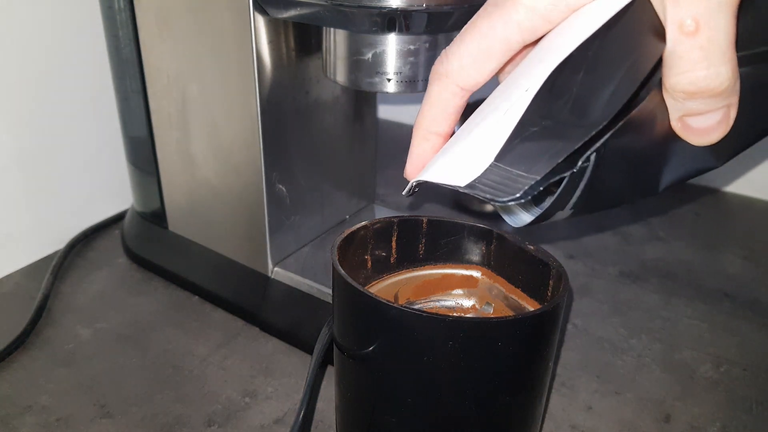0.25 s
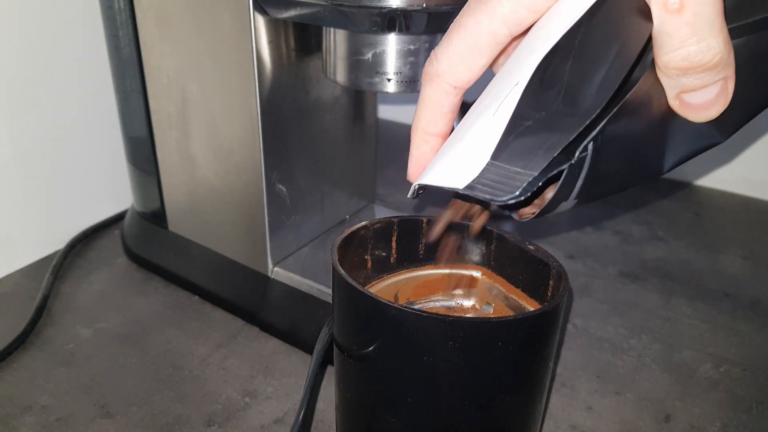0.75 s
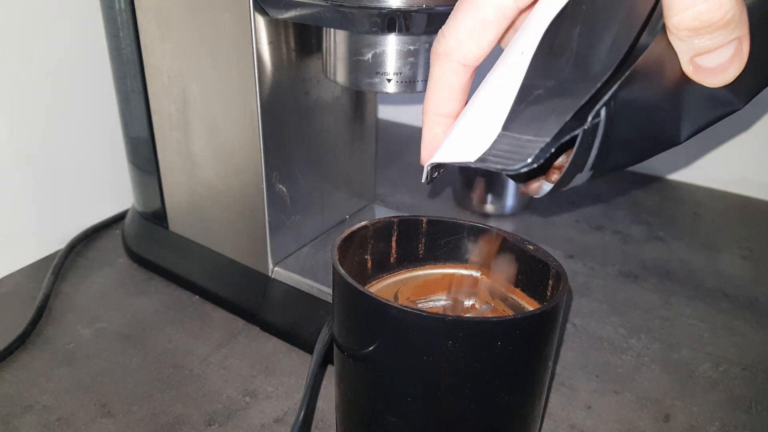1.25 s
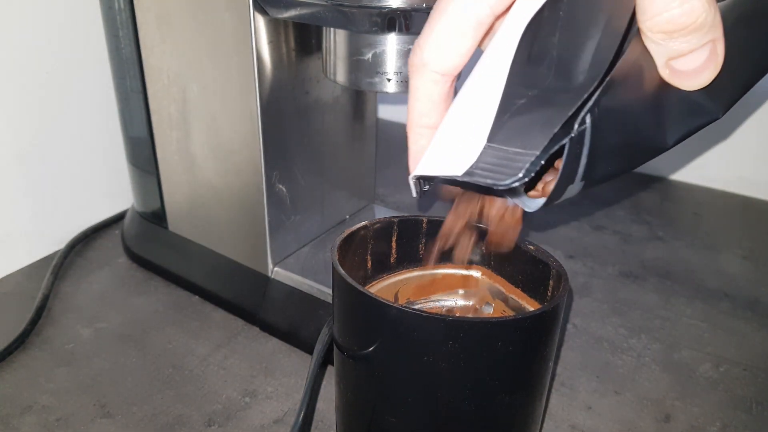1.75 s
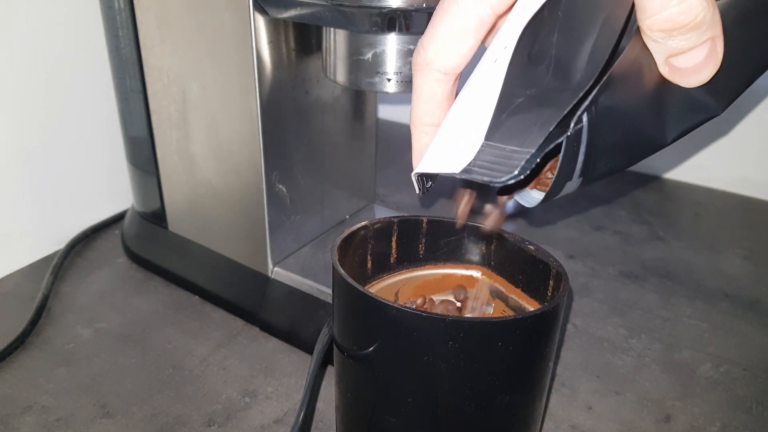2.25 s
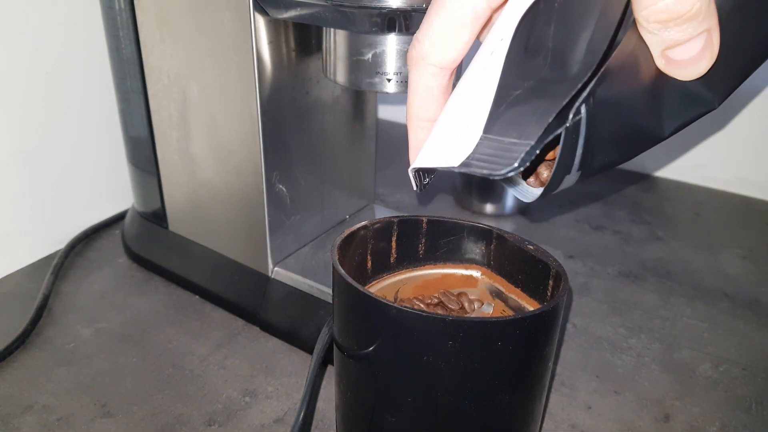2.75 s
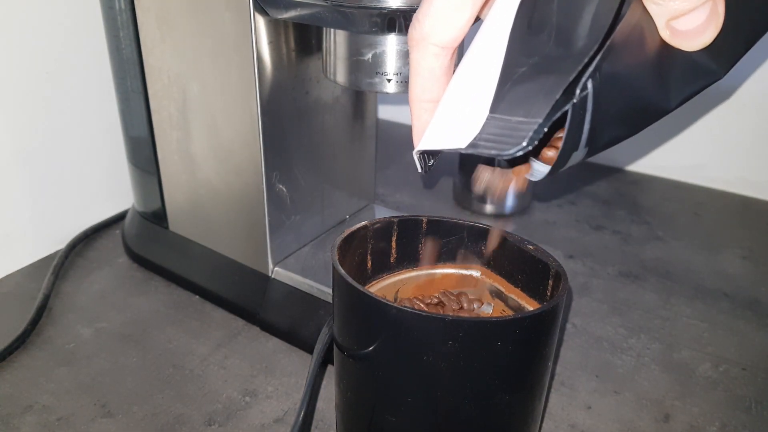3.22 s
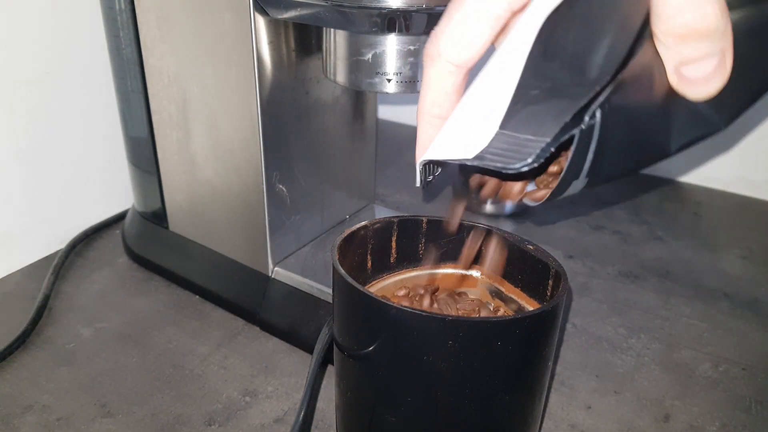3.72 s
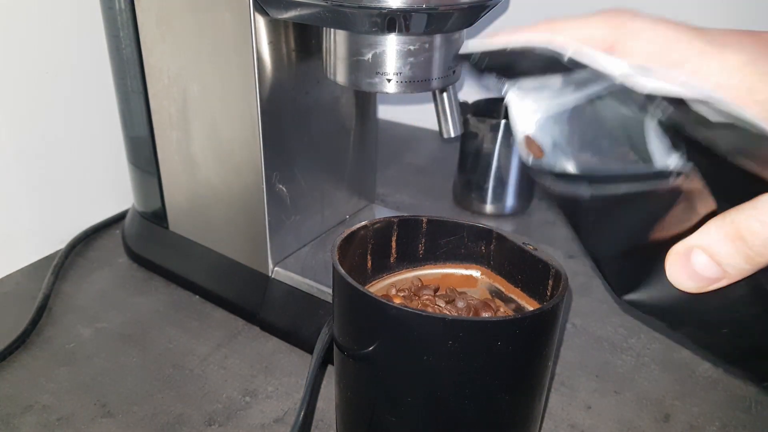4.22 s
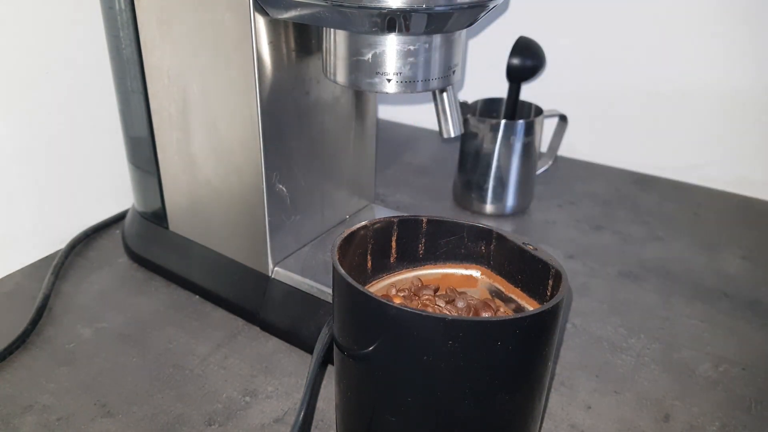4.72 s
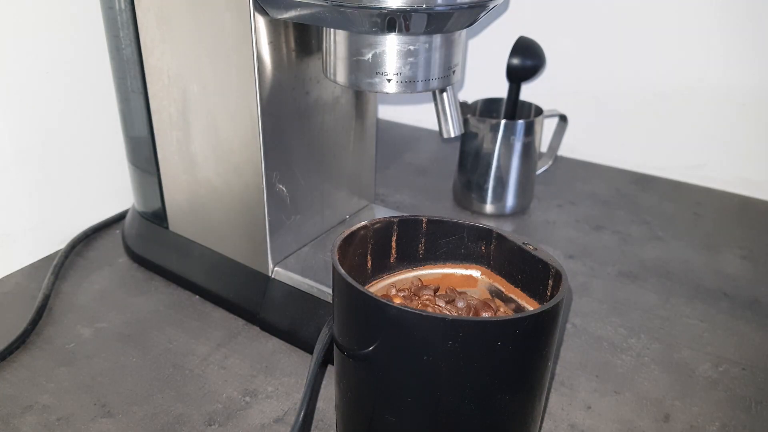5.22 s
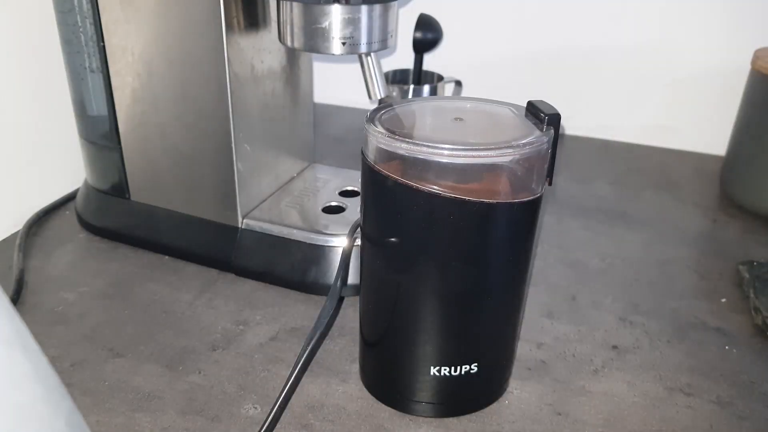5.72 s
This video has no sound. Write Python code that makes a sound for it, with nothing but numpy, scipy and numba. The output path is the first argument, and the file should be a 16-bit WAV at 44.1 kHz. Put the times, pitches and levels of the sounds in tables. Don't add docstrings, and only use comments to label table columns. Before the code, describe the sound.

Coffee beans tick and ring into a small metal cup from a crinkling bag, followed by loud foil crumpling, a slump and quiet.

```python
import sys
import numpy as np
from scipy import signal
from scipy.fft import rfft, irfft
from scipy.io import wavfile
from scipy.ndimage import uniform_filter1d
from numba import njit

SR = 44100
rng = np.random.default_rng(int(sys.argv[2]) if len(sys.argv) > 2 else 0)


def store_pcm(level_fs):
    pcm = np.round(np.clip(level_fs, -1, 1) * 32767).astype(np.int16)
    wavfile.write(sys.argv[1], SR, np.atleast_2d(pcm).T)


def amplitude_ratio(level_db):
    exponent = np.asarray(level_db, float) / 20
    return 10 ** exponent


N = 263277
SCENE_CHANGE_S = 5.386

# time in seconds, drag on the foil in dB.
TILT = [(0, -46.5), (.06, -50.5), (.1, -47.5), (.265, -52), (.42, -43.5), (.55, -38.5), (.68, -39.5),
        (1.145, -49), (1.265, -52), (1.41, -48), (1.875, -44), (2.23, -48), (2.4, -44), (2.69, -51.5),
        (2.775, -47.5), (2.865, -57), (2.93, -52), (3.3, -48), (3.38, -41.5), (3.74, -43), (3.945, -49)]
# time in seconds, drag in dB, weight on the counter in dB.
PUT_DOWN = [(3.945, -54, -27.5), (4.005, -39.5, -20), (4.035, -45.5, -31), (4.07, -31, -25),
            (4.11, -42.5, -25), (4.26, -35.5, -21), (4.335, -37, -24), (4.37, -31, -19.5),
            (4.445, -39.5, -21.5), (4.505, -40.5, -7), (4.62, -38.5, -10.5), (4.7, -42.5, -25.5),
            (4.77, -34.5, -25.5), (4.85, -40, -22.5), (5.01, -64.5, -48)]
# time in seconds, drag in dB, weight on the counter in dB.
SLUMP = [
    (5.01, -56.5, -36),
    (5.1, -58.5, -14),
    (5.128, -46.5, -1.5),
    (5.16, -54, 0),
    (5.228, -49.5, -25),
    (5.246, -34.5, -11.5),
    (5.33, -44.5, -16.5),
    (5.38, -53.5, -19),
]
# start in seconds, peak in dB, pitch in Hz, edge above 2.5 kHz in dB.
SNAPS = [(.077, -25.5, 1490, -16), (0.083, -29, 1490, -11), (0.107, -38, 900, -2), (.125, -38.5, 700, -25),
         (.345, -32, 720, -20), (.417, -29, 1510, -12), (0.225, -28, 2720, 0.5), (0.312, -36.5, 1570, -1),
         (0.409, -26, 755, -13), (.021, -27.5, 1480, -27), (.178, -30.5, 1300, -21), (.276, -38, 2740, 1),
         (.36, -44, 1400, -12), (0.476, -27, 1500, -12.5), (.489, -25, 1800, -11.5), (0.503, -34, 1400, -3),
         (.577, -29.5, 1490, -9), (0.659, -23, 1700, -1), (.694, -30, 1510, 2), (4.051, -29, 1210, -16.5),
         (4.124, -27, 1060, -22), (4.151, -20.5, 1390, -9.5), (4.281, -23.5, 2020, -6.5),
         (4.323, -26.5, 1200, -21), (4.385, -20.5, 1100, -22.5), (4.7, -22, 920, -19),
         (4.728, -17, 1140, -16), (4.804, -23, 1490, -22), (4.93, -43, 1240, -20), (4.958, -38, 1800, -17),
         (5.04, -37, 2100, -15), (3.414, -20.5, 1170, -17), (3.992, -27.5, 1190, -28),
         (4.064, -29.5, 1440, -15), (4.255, -22, 2220, -19.5), (4.362, -15, 1100, -25),
         (4.425, -15, 1010, -32.5), (4.453, -12.5, 980, -31), (4.472, -12, 910, -24.5),
         (4.482, -19, 710, -23.5), (4.484, -10.5, 890, -28.5), (4.496, -13.5, 1080, -26.5),
         (4.501, -3.5, 1590, -35), (4.508, -13, 1030, -26.5), (4.554, -11, 1120, -22.5),
         (4.6484, -1, 1080, -32), (4.744, -4.5, 1970, -13), (4.865, -15, 1265, -16.5),
         (5.108, -23, 700, -10), (5.124, -14, 2040, 0.5), (5.152, -27, 1930, -22), (5.235, -23, 606, -17),
         (5.245, -24, 2100, 2.5), (5.293, -21.5, 1073, -24.5), (5.313, -14.5, 1373, -50)]
# start in seconds, peak in dB.
CRACKS = [
    (.226, -44),
    (.312, -37),
    (.408, -32),
    (4.474, -46),
    (4.504, -45),
    (4.6487, -30.5),
    (4.7445, -45),
    (5.1245, -34),
    (5.245, -43),
]
# start in seconds, peak in dB, pitch in Hz.
BUMPS = [(.87, -61, 83), (1.03, -48, 80), (1.451, -34.5, 427), (3.294, -47, 68.1), (3.328, -39, 140),
         (3.57, -48, 55), (4.483, -28, 210), (4.645, -33, 81), (4.648, -29, 252), (4.717, -30.5, 272),
         (5.112, -42, 60), (5.125, -41, 150), (3.698, -43, 162), (4.2, -46, 170), (4.35, -48, 170),
         (5.271, -50, 71)]
# start in seconds, level in dB, pitch in Hz, 60 dB decay in seconds.
CHIMES = [
    (6.8, -39.5, 1900, 0.12),
    (4.746, -30.5, 1990, 0.15),
    (2.92, -40, 636, 0.038),
    (2.76, -41, 880, 0.026),
    (4.505, -29, 300, 0.039),
]
# frequency in Hz, level in dB per Hz.
RUSTLE = [(150, -47), (250, -13), (434, -13), (554, -5), (646, -4), (1210, 0.5), (3500, -11.5),
          (4550, -40.5), (7700, -120)]
FOIL = [(1060, -41.5), (1800, 0.5), (3480, -5), (4790, -7), (6020, -13.5), (8130, -28.5), (12200, -17.5),
        (16000, -28)]
RUMBLE = [(15, -50.5), (36, -22.5), (62, -1.5), (144, -7.5), (193, 8.5), (450, 3.5), (580, -42),
          (990, -120)]
# frequency in Hz, width in Hz, gain in dB.
POUCH = [(560, 70, 7), (727, 26, 9.5), (1167, 36, 6), (1560, 32, 5), (2010, 200, 6.5)]
# frequency in Hz, gain in dB.
CRUMPLED = [(300, -2), (600, -2.5), (900, 2), (1400, 1.5), (2300, -3), (4000, -4.5)]
EDGE = [(700, -25), (1800, -1.5), (3500, 3), (5500, 2), (7500, -15), (11000, -15), (16000, -25.5)]

# time in seconds, flow in dB.
FLOW = [(.7, -53), (.8, -57), (.925, -32), (1.04, -44.5), (1.2, -40), (1.335, -43.5), (1.5, -66),
        (1.625, -45), (1.87, -43.5), (2.11, -41.5), (2.23, -48.5), (2.6, -45.5), (2.86, -56), (2.92, -61),
        (3.135, -58.5), (3.475, -41.5), (3.885, -48), (3.955, -82)]
# start in seconds, peak in dB, strongest ring in Hz, tick in dB.
STRIKES = [(0.73, -28, 2960, -32), (0.7744, -19, 3190, -32), (0.7877, -23.5, 5230, -27.5),
           (0.8289, -23, 4800, -45), (0.843, -16.5, 5150, -20), (0.921, -27.5, 2870, -42),
           (1.09, -29, 4160, -45), (1.176, -32, 4290, -28), (1.188, -27, 3270, -22),
           (1.3172, -25.5, 5430, -21), (1.344, -26, 3040, -25), (1.531, -28, 2920, -38),
           (1.614, -22.5, 3060, -31), (1.6871, -25, 4800, -25.5), (1.742, -24.5, 3270, -30),
           (1.811, -29.5, 3040, -29), (1.853, -26, 3100, -26), (1.9045, -25.5, 3900, -48),
           (1.942, -29, 4220, -32), (2.0213, -28, 3250, -33), (2.094, -29.5, 4230, -30),
           (2.1014, -27, 3140, -30), (2.18, -24, 4360, -27), (2.3375, -30.5, 2760, -32.5),
           (2.3604, -25.5, 5570, -36), (2.5718, -26.5, 3820, -34), (2.8933, -33, 3180, -35.5),
           (3.155, -34.5, 5860, -33), (3.2643, -27.5, 3480, -34.5), (3.3535, -26.5, 4510, -51),
           (.853, -41.5, 3050, -52.5), (0.8975, -34, 2800, -49), (0.9033, -25.5, 3200, -45),
           (.818, -32, 4360, -51), (1.725, -29, 4000, -32), (1.662, -35, 4200, -42),
           (0.955, -34, 4370, -31), (1.027, -25, 4300, -38), (1.125, -42, 4530, -41),
           (1.2563, -47, 4600, -36), (1.292, -40, 3100, -51), (1.4716, -43, 2966, -62),
           (1.5709, -49, 2580, -58), (1.627, -34, 4250, -42), (1.636, -32, 4030, -45),
           (1.67, -27.5, 3200, -32), (1.837, -32, 4260, -30), (1.845, -35, 4360, -29.5),
           (2.2327, -42, 2700, -45), (2.2423, -39, 2900, -43), (2.2605, -31, 2810, -48),
           (0.936, -31.5, 4300, -44.5), (2.131, -35, 4150, -32), (2.621, -51, 3200, -49)]
# start in seconds, peak in dB, pitch in Hz, ring passed to the steel in dB.
TICKS = [(.8168, -25, 10550, -42.5), (.8649, -33, 12180, -59.5), (.9036, -26.5, 11780, -33.5),
         (.9636, -26.5, 10550, -30), (1.1437, -27, 12800, -34.5), (1.291, -29, 12900, -35),
         (1.3916, -31.5, 13500, -35.5), (1.555, -27.5, 14070, -66.5), (1.866, -23, 9590, -29.5),
         (1.8937, -29, 12500, -59), (1.9123, -28, 13150, -53), (1.9834, -32, 13500, -27),
         (2.2708, -27, 13750, -36), (2.3785, -32, 13700, -39), (2.4015, -26, 11940, -28),
         (2.4895, -30.5, 13800, -37), (2.5207, -31, 13580, -31), (2.5982, -24.5, 15100, -30),
         (2.6127, -38, 13900, -45), (2.6514, -28, 14620, -34), (2.7718, -28, 14860, -46),
         (3.0154, -34.5, 14300, -39.5), (3.1003, -34, 12600, -42), (3.171, -29, 13640, -38),
         (3.2063, -29, 14400, -33), (3.315, -28, 14730, -32.5), (3.417, -26, 14760, -57),
         (3.4797, -27, 14100, -52), (3.5835, -28.5, 13570, -30.5), (3.7184, -29, 13200, -37),
         (.8935, -30.5, 12940, -48), (1.0755, -36.5, 15300, -52), (1.115, -36, 13500, -57),
         (1.792, -41.5, 14500, -48), (2.446, -40, 13000, -47), (2.4679, -37, 13900, -37),
         (2.687, -39.5, 12400, -50), (2.8715, -52, 10900, -64), (3.2931, -40, 12200, -40),
         (3.4377, -38, 11700, -60), (3.4642, -30, 14400, -54), (3.534, -30.5, 11800, -36),
         (3.6403, -35, 12100, -44), (3.6802, -40, 13400, -54), (3.7066, -36, 12640, -50),
         (3.8154, -45, 11900, -53), (3.93, -53, 12000, -60), (3.998, -45, 13900, -54),
         (4.062, -41, 13400, -51.5), (4.088, -53, 12040, -61)]
# start in seconds, tick in dB, ring in dB.
STRAYS = [(1.0024, -49, -54), (1.024, -24.5, -39), (1.075, -46, -53), (1.216, -29, -50),
          (1.4358, -46.5, -32), (1.513, -37, -49), (1.5988, -33, -31), (1.657, -36, -33), (2.073, -30, -38),
          (2.7323, -39.5, -39), (2.771, -53, -51), (2.9228, -36, -35.5), (2.955, -48, -40),
          (2.992, -55, -45), (3.048, -42.5, -40.5), (3.0856, -38, -35), (3.341, -36, -59),
          (3.405, -36.5, -59), (3.445, -41, -60), (3.633, -31, -31.5), (3.76, -34.5, -51),
          (3.8345, -35, -43), (3.8822, -40, -60), (1.151, -30, -31), (1.203, -33, -30), (1.283, -35, -49),
          (1.969, -37, -35), (2.001, -31, -41), (2.044, -34, -32.5), (2.187, -44, -35), (2.118, -36, -36),
          (2.23, -45, -54), (0.951, -37, -52), (1.098, -43, -52)]
# start in seconds, peak in dB.
BOOMS = [(0.828, -54), (0.929, -52), (1.083, -51), (1.19, -51), (1.398, -56), (1.531, -53), (1.63, -61),
         (1.714, -58.5), (1.864, -51), (1.934, -56), (2.025, -58), (2.088, -60), (2.181, -59), (2.292, -55),
         (2.47, -61), (2.534, -54), (2.655, -55), (2.905, -62), (3.102, -64), (3.183, -64), (3.277, -50),
         (3.327, -55), (3.436, -66), (3.541, -60), (3.596, -57), (3.823, -64)]
# frequency in Hz, level in dB, 60 dB decay in seconds.
CUP = [(2737, -4, 0.14), (2960, -3, 0.1), (3270, -2, 0.081), (3920, -4.5, 0.15), (4360, -5.5, 0.083),
       (4290, -3, 0.096), (4437, -2, 0.068), (4800, -2, 0.052), (5150, -3, 0.04), (5570, -1.5, 0.049),
       (6090, 0, 0.039), (9480, 4.5, 0.025), (11400, -5.5, 0.06)]
# frequency in Hz, gain in dB.
CONTACT = [(900, -30), (2200, 2), (3500, -3), (6000, -1), (8000, 2), (12000, -3.5), (16000, -2.5)]

# frequency in Hz, level in dB per Hz.
KITCHEN = [(15, -47), (28, -20), (48, 0), (64, 0), (75, -6), (323, -12), (423, -15), (1030, -19),
           (1580, -20), (2240, -14), (3640, -25), (5170, -24), (7340, -37), (12200, -17), (15600, -15)]
# frequency in Hz, gain in dB.
OPEN = [(26, -13), (45, -2), (90, 2.5), (5500, -0.5), (6800, 1), (8000, -5), (9200, -4.5), (10000, 0)]
COVERED = [(100, -32.5), (170, -20.5), (400, -59.5), (1000, -67.5), (1900, -79), (2400, -27), (3100, -80),
           (6000, -73.5), (9400, -40), (16000, -30.5)]
TOP = [(15700, 0), (15950, -36)]

TRICKLE_DB, STREAM_DB = -79, -39
FOIL_DB, FOIL_LOADED_DB = -6.5, 4
FOIL_BRIGHTENS = 0.35
FOIL_AWAY_DB = -8.5
HAND_DB, HAND_LOADED_DB = -33.5, 13
CREASE_DB, UNFOLD_DB, UNFOLD_S = -8, -26, 0.0087
BARE_RING_DB, BURIED_DB_PER_S = 9, 0.08
BURIED_RING_HZ = 2944
NOTE_DB, NOTE_CYCLES = -12, 110
TICK_HZ, TICK_RISE_HZ_PER_S, TICK_LEAD_S = 11400, 510, 0.0003
CRACK_CYCLES, TICK_SPREAD_S, TICK_LOW_HZ = 9.0, 0.0016, 10000
SETTLE_S, SETTLE_TICK_DB, SETTLE_RING_DB, LULL_DB = 0.011, -21, -9, -9.5
THUMP_DB, THUMP_SLOPE = -64, 0.34
SHAKE_DB, SHAKE_S = -39.5, 0.042
BOOM_HZ, BOOM_CYCLES, BOOM_DB = 160.3, 19, -2.5
ROOM_T60_S, ROOM_TREBLE_T60_S, ROOM_DB = 0.41, 0.091, -4.5
KITCHEN_DB = -74


def level(x, db):
    return x * amplitude_ratio(db) / np.sqrt(np.mean(x ** 2))


def curves(table):
    s, *columns = np.transpose(table)
    t = np.arange(N) / SR
    return [np.interp(t, s, column, left=-120, right=-120) for column in columns]


def colour(x, points, peaks=()):
    hz = np.maximum(np.arange(2049) * SR / 4096, 1.0)
    point_hz, point_db = np.transpose(points)
    db = np.interp(np.log(hz), np.log(point_hz), point_db)
    for peak_hz, width, gain_db in peaks:
        db = db + gain_db / (1 + (2 * (hz - peak_hz) / width) ** 2)
    cepstrum = irfft(np.log(amplitude_ratio(db)))
    cepstrum[1:2048] *= 2
    cepstrum[2049:] = 0
    return signal.oaconvolve(x, irfft(np.exp(rfft(cepstrum))))[:N]


@njit
def ring(s, size, hz, t60):
    out = np.zeros(N)
    for k in range(len(s)):
        turn = np.exp(2j * np.pi * hz[k] / SR - 6.9 / (t60[k] * SR))
        opening = np.exp(-2 * hz[k] / SR)
        z, closed, start = size[k] + 0j, 1., int(s[k] * SR)
        for i in range(start, min(N, start + int(t60[k] * SR))):
            out[i] += z.imag * (1 - closed)
            z *= turn
            closed *= opening
    return out


def burst(s, db, hz, cycles, scatter, late_s, count):
    chance = rng.standard_normal((len(s), 3, count))
    other = np.arange(count) > 0
    pitch = (hz[:, None] * np.exp(scatter * chance[:, 0] * other)).clip(30, 16800)
    start = s[:, None] + late_s * np.abs(chance[:, 1]) * other
    weaker = 1.98 * chance[:, 2] * amplitude_ratio(-2.5 * chance[:, 0] ** 2) / np.sqrt(count)
    size = amplitude_ratio(db[:, None]) * np.where(other, weaker, 1)
    return ring(start.ravel(), size.ravel(), pitch.ravel(), (cycles / pitch).ravel())


def impulses(s, db):
    spikes = np.zeros(N)
    np.add.at(spikes, (s * SR).astype(int), amplitude_ratio(db))
    return spikes


def click(s, db, points):
    return colour(impulses(s, db), points)


def settling(s, db, settle_s):
    return signal.lfilter([1], [1, -np.exp(-1 / (settle_s * SR))], impulses(s, db))


def crackle(rate, spread_db, smooth):
    happens = rng.random(N) < rate / SR
    clicks = happens * rng.standard_normal(N) * amplitude_ratio(spread_db * rng.exponential(size=N).clip(0, 4))
    return level(level(clicks, 0) + smooth * rng.standard_normal(N), 0)


def flutter(rate, depth_db):
    k = int(SR / rate)
    steps = np.repeat(rng.standard_normal(N // k + 1), k)
    return amplitude_ratio(depth_db * uniform_filter1d(steps, k)[:N])


def sliding_foil(tilt, drag_db, load):
    over_cup = tilt > -100
    foil_db = drag_db + np.where(over_cup, FOIL_DB, FOIL_AWAY_DB) + FOIL_LOADED_DB * load
    foil_db = foil_db + np.where(over_cup, FOIL_BRIGHTENS * (drag_db + 44), 0)
    press = flutter(40, 2.07) * flutter(17, 0.41)
    rustle = level(press * colour(crackle(2500, 2.1, 0.94), RUSTLE, POUCH), -4.0)
    rustle = np.where(over_cup, rustle, colour(rustle, CRUMPLED))
    foil = level(press * colour(crackle(1500, 0.52, 0.96), FOIL), -1.8)
    foil_share = amplitude_ratio(np.minimum(foil_db - drag_db, -0.4))
    snap_s, snap_db = np.transpose(SNAPS)[:2]
    drag = amplitude_ratio(drag_db) + settling(snap_s + 0.0012, snap_db + UNFOLD_DB, UNFOLD_S)
    return drag * (rustle + foil_share * foil)


def hand_rumble(tilt, down, slump, load):
    rumble_db = np.max([tilt + HAND_DB + HAND_LOADED_DB * load, sum(down), sum(slump)], axis=0)
    rumble = flutter(21, 1.7) * colour(crackle(300, 2.5, 0.4), RUMBLE)
    return amplitude_ratio(rumble_db) * level(rumble, -3.6)


def foil_snaps(drag_db):
    s, db, hz, edge_db = np.transpose(SNAPS)
    s = s + 0.0012
    cycles = 14.2 * hz[:, None] / 1000
    snaps = burst(s, db - 13.0, hz, cycles, 0.33, 0.0015, count=16)
    snaps = snaps + burst(s, db - 8.5, hz, 4.5, 0.3, 0.0002, count=3)
    edges = burst(s, db + edge_db - 6.0, 3900 + 0 * s, 13.0, 0.55, 0.0012, count=40)
    edges = edges + click(s, db + edge_db + 9.0, EDGE)
    crack_s, crack_db = np.transpose(CRACKS)
    cracks = burst(crack_s, crack_db, 10500 + 0 * crack_s, 3.1, 0.37, 0.00023, count=14)
    chance = rng.random((900, 3))
    size_db = -3 * np.log(chance[:, 1]).clip(-3, 0)
    pitch = 850 * 2 ** (1.57 * chance[:, 2])
    creases = burst(SCENE_CHANGE_S * chance[:, 0], size_db, pitch, 4.8, 0.25, 0.001, count=4)
    return snaps + edges + cracks + amplitude_ratio(drag_db) * level(creases, CREASE_DB - 6.0)


def counter_knocks():
    s, db, hz = np.transpose(BUMPS)
    thuds = burst(s, db, hz, 5.0, 0.33, 0.0027, count=1)
    s, db, hz, t60 = np.transpose(CHIMES)
    return thuds + ring(s, amplitude_ratio(db), hz, t60)


def bag():
    flow_db, = curves(FLOW)
    load = np.clip((flow_db - TRICKLE_DB) / (STREAM_DB - TRICKLE_DB), 0, 1)
    (tilt,), down, slump = curves(TILT), curves(PUT_DOWN), curves(SLUMP)
    drag_db = np.max([tilt, down[0], slump[0]], axis=0)
    handling = sliding_foil(tilt, drag_db, load) + hand_rumble(tilt, down, slump, load)
    return handling + foil_snaps(drag_db) + counter_knocks()


def cup(s, db, hz, focus, floor_db):
    mode_hz, mode_db, t60 = np.transpose(CUP)
    chance = rng.standard_normal((len(s), 2, len(CUP)))
    octaves_away = np.abs(np.log2(mode_hz / hz[:, None]))
    size_db = db[:, None] + mode_db - np.minimum(focus * octaves_away, floor_db)
    size_db = size_db + 4.0 * np.abs(chance[:, 0]) - 3.0
    size = np.sign(chance[:, 0]) * amplitude_ratio(size_db)
    decay = t60 * np.exp(-0.15 * s[:, None] - 0.292 * np.abs(chance[:, 1]))
    pitch = mode_hz * (1 + 0.028 * chance[:, 1])
    return ring(np.repeat(s, len(CUP)), size.ravel(), pitch.ravel(), decay.ravel())


def steel_strikes(s, db, hz):
    strikes = cup(s, db - 12.0, hz, 8.0, 13.0)
    strikes = strikes + burst(s, db - 5.5, hz, 27.0, 0.17, 0.0012, count=16)
    strikes = strikes + click(s - TICK_LEAD_S, db + 4.0, CONTACT)
    steel_s, steel_db, steel_hz, _ = np.transpose(STRIKES)
    return strikes + ring(steel_s, amplitude_ratio(steel_db + NOTE_DB), steel_hz, NOTE_CYCLES / steel_hz)


def bean_ticks(s, db, hz):
    cracks = burst(s, db + 0.8, 12500 + 0 * s, CRACK_CYCLES, 0.27, 0.0001, count=10)
    return cracks + burst(s, db + 0.5, hz, 52.0, 0.2, TICK_SPREAD_S, count=20)


def bean_stream(ring_gain, tick_gain):
    chance = rng.random((1500, 3))
    s = 0.7 + 3.3 * chance[:, 0]
    db = -2.5 * np.log(chance[:, 1]).clip(-2.2, 0)
    pitch = 2700 * 2 ** (1.225 * chance[::2, 2])
    rings = cup(s[::2], db[::2] - 2.0, pitch, 6.3, 19.0)
    rings = rings + burst(s[::2], db[::2] + 4.0, pitch, 39.0, 0.263, 0.00091, count=6)
    ticks = burst(s, db, 11500 + 2500 * chance[:, 2], 55.0, 0.34, 0.00045, count=14)
    return ring_gain * level(rings, -9.0) + tick_gain * level(ticks, -4.0)


def housing(flow_db, s, db):
    thump_db = np.where(flow_db > -100, THUMP_DB + THUMP_SLOPE * (flow_db - STREAM_DB), flow_db)
    body = [(50, -23.0), (110, -21.5), (150, -7), (170, -1.5), (260, -34.5)]  # Hz, dB
    thump = colour(crackle(400, 1.6, 0.61), body, [(160.2, 45, 3)])
    shaking = amplitude_ratio(thump_db) + settling(s, db + SHAKE_DB, SHAKE_S)
    boom_s, boom_db = np.transpose(BOOMS)
    booms = burst(boom_s, boom_db + BOOM_DB, BOOM_HZ + 0 * boom_s, BOOM_CYCLES, 0.078, 0.02, count=3)
    return booms + shaking * level(flutter(16, 1.9) * thump, -9.0)


def beans():
    flow_db, = curves(FLOW)
    steel_s, steel_db, steel_hz, steel_tick_db = np.transpose(STRIKES)
    loose_s, loose_db, loose_hz, loose_ring_db = np.transpose(TICKS)
    stray_s, stray_tick_db, stray_ring_db = np.transpose(STRAYS)

    ring_s = np.r_[steel_s, loose_s, stray_s]
    ring_db = np.r_[steel_db, loose_ring_db, stray_ring_db]
    ring_hz = np.r_[steel_hz, BURIED_RING_HZ + 0 * loose_s, BURIED_RING_HZ + 0 * stray_s]
    small_ring_db = flow_db + BARE_RING_DB + BURIED_DB_PER_S * np.arange(N) / SR
    ring_gain = amplitude_ratio(small_ring_db + LULL_DB) + settling(ring_s, ring_db + SETTLE_RING_DB, SETTLE_S)

    note_hz = TICK_HZ + TICK_RISE_HZ_PER_S * np.r_[steel_s, stray_s]
    note_hz = note_hz * np.exp(0.16 * rng.standard_normal(len(note_hz)))
    tick_s = np.r_[steel_s - TICK_LEAD_S, stray_s, loose_s]
    tick_db = np.r_[steel_tick_db, stray_tick_db, loose_db]
    tick_hz = np.r_[np.maximum(note_hz, TICK_LOW_HZ), loose_hz]
    tick_gain = amplitude_ratio(flow_db + LULL_DB) + settling(tick_s, tick_db + SETTLE_TICK_DB, SETTLE_S)

    clear = steel_strikes(ring_s, ring_db, ring_hz) + bean_ticks(tick_s, tick_db, tick_hz)
    return clear + bean_stream(ring_gain, tick_gain) + housing(flow_db, tick_s, tick_db)


def room(x):
    t = np.arange(int(0.6 * SR)) / SR
    late = t > 0.002
    noise = rng.standard_normal(len(t))
    dull = uniform_filter1d(noise, size=4)
    treble = 4.15 * (noise - dull)
    tail = (dull * amplitude_ratio(-60 * t / ROOM_T60_S) + treble * amplitude_ratio(-60 * t / ROOM_TREBLE_T60_S)) * late
    power = np.abs(rfft(tail)) ** 2
    even = np.sqrt(uniform_filter1d(power, size=1500) / uniform_filter1d(power, size=50))
    tail = irfft(rfft(tail) * even, len(t)) * late
    return x + signal.oaconvolve(x, amplitude_ratio(ROOM_DB) * tail / np.linalg.norm(tail))[:N]


def scene():
    t = np.arange(N) / SR
    action = room(bag() + beans()) * np.clip((SCENE_CHANGE_S - t) / 0.0011, 0, 1)
    bump = ring(np.array([SCENE_CHANGE_S]), np.array([amplitude_ratio(-47.0)]), np.array([55.0]), np.array([0.09]))
    return np.array([action, action + bump])


def kitchen_air(peaks):
    return level(colour(rng.standard_normal(N), KITCHEN[:-1], peaks), KITCHEN_DB + 4)


def top_cut(x):
    return signal.sosfilt(signal.butter(12, 16960, fs=SR, output="sos"), x)


def record(dry):
    left_air = kitchen_air([(2350, 700, 4)])
    right_air = kitchen_air([(2400, 500, -2)])
    left = np.roll(colour(2 * dry[0], COVERED), 9)
    right = colour(2 * dry[1], OPEN)
    ports = np.array([colour(left + left_air, TOP), colour(right + right_air, TOP)])
    mix = 0.7 * np.tanh(ports / 0.7)
    return top_cut(mix)


dry = scene()
out = record(dry)
store_pcm(out)
```